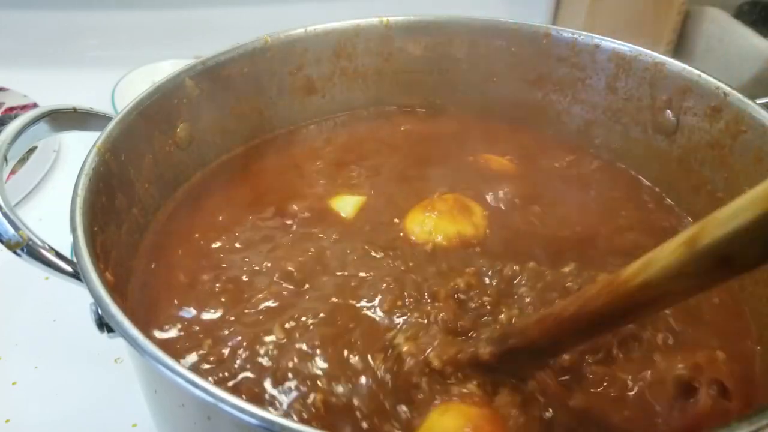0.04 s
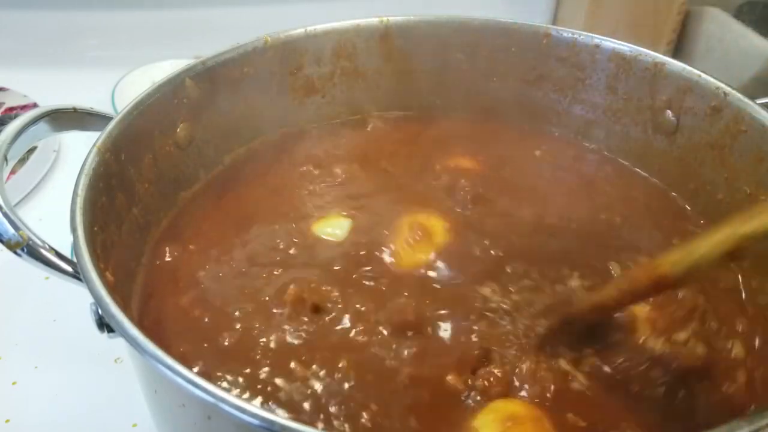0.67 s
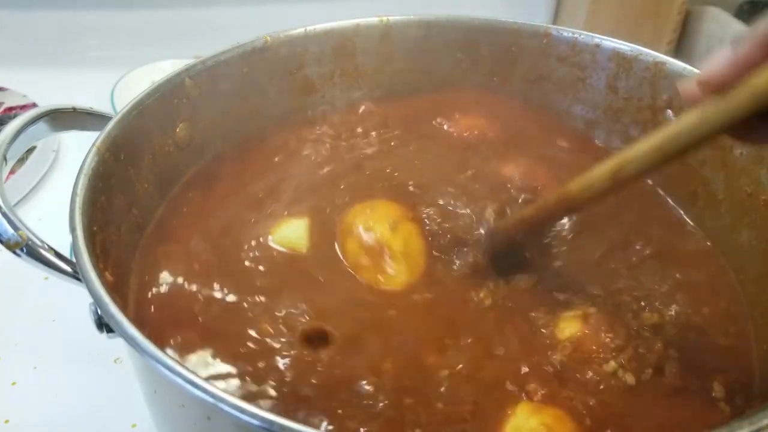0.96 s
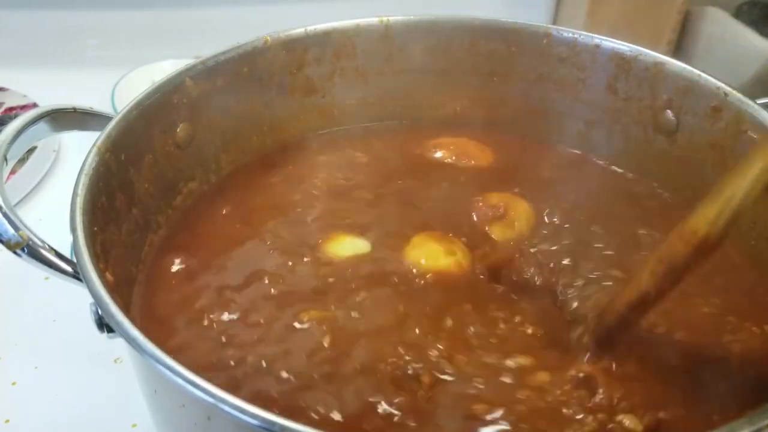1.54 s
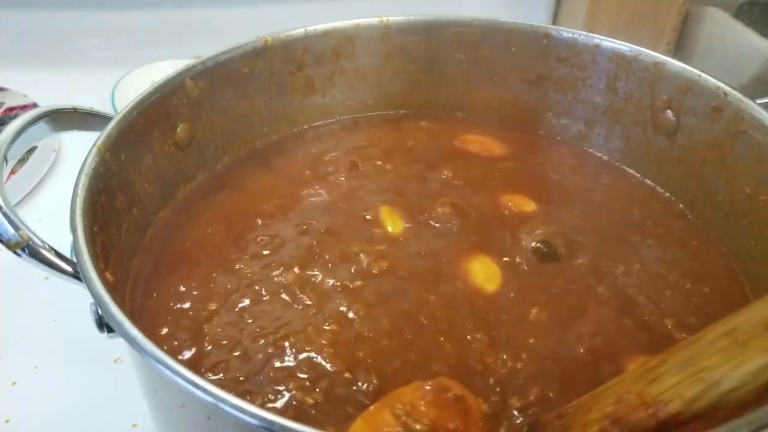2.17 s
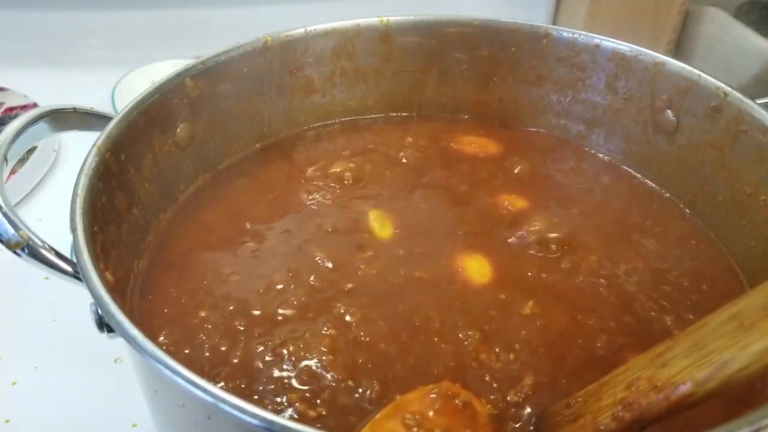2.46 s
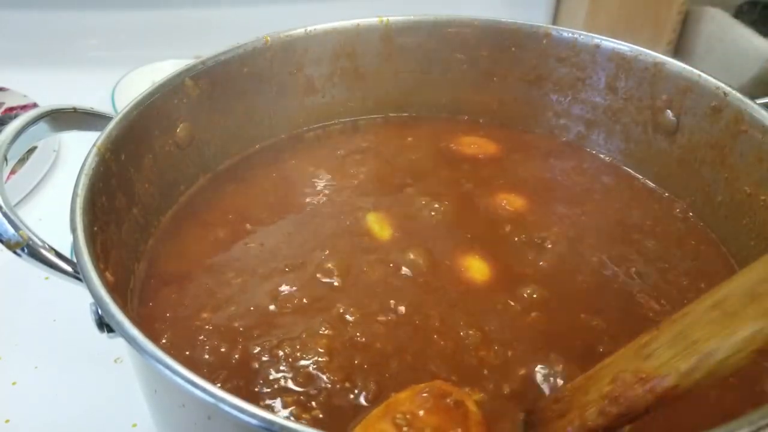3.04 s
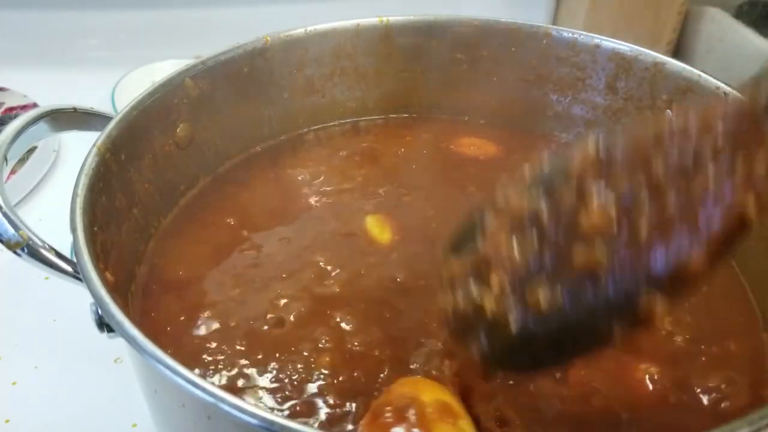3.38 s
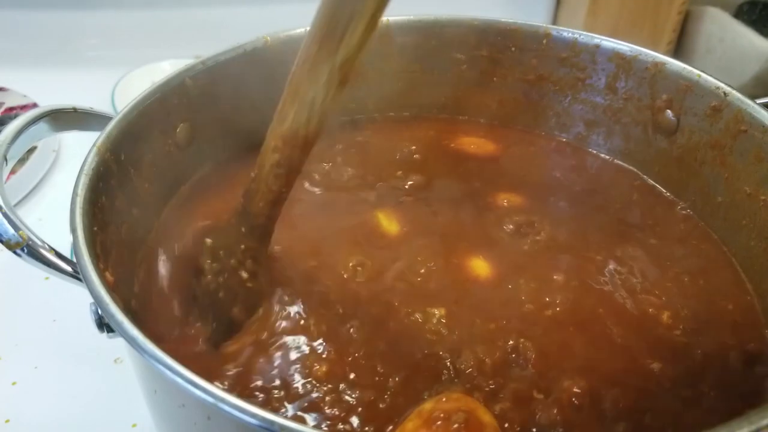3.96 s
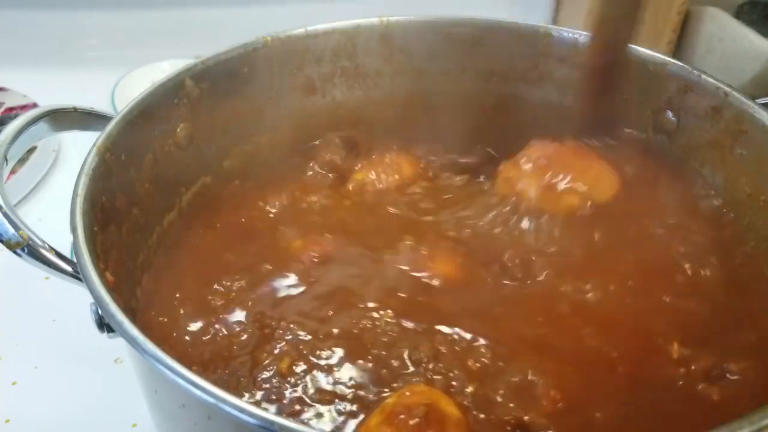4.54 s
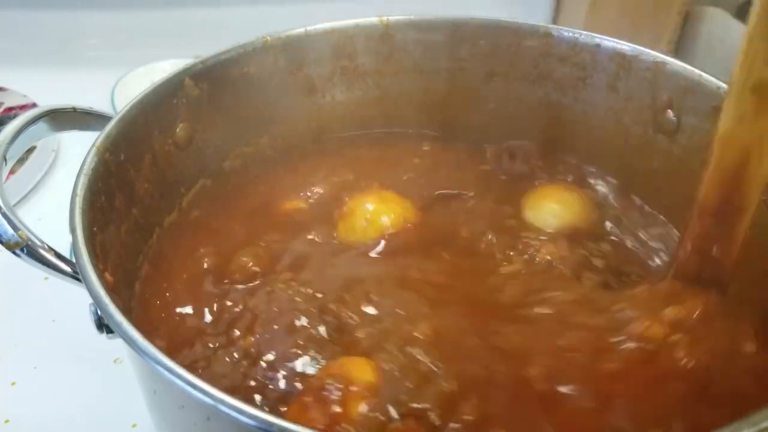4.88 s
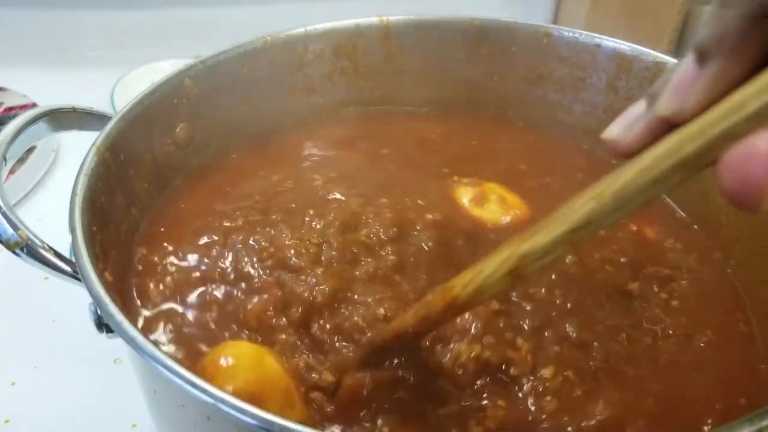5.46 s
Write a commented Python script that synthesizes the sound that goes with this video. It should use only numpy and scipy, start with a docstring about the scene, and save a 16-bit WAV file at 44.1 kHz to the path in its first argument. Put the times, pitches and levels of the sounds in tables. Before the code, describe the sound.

Thick stew bubbles, pops and sputters in a large metal pot while a wooden spoon stirs it and ticks the side once.

```python
"""Thick stew simmers in a large metal pot. From the start a wooden spoon churns it, while bubbles open
with short, choked, rising rings, skins snap, and steam pockets collapse with a glop and a spurt.
Just before one second the spoon ticks the steel wall, and the stew bubbles on by itself.
From 3.7 s the stirring returns and the pops crowd in; from 4.5 to 5.2 s the spoon drags along the bottom
with a low rumble. The pot and the kitchen answer every pop, over a faint hum."""
import sys
import numpy as np
from scipy import signal
from scipy.fft import rfft, irfft, next_fast_len
from scipy.io import wavfile
from scipy.ndimage import map_coordinates

SR = 44100
rng = np.random.default_rng(int(sys.argv[2]) if len(sys.argv) > 2 else 0)


def log_audio(samples):
    """Write samples as a 16-bit WAV file to the path given in sys.argv[1]."""
    # one column per channel
    frames = np.atleast_2d(samples).T
    # limit to full scale, then quantise
    limited = np.clip(frames, -1, 1)
    pcm = np.round(limited * 32767).astype(np.int16)
    wavfile.write(sys.argv[1], SR, pcm)


N = 247401


# Foreground bubbles opening: start_s, level_db, pitch_hz, ring_cycles
BUBBLE_HITS = [(0.0359, -28, 1570, 1.9), (0.1301, -20, 1510, 1.7), (0.2186, -27.5, 1780, 2.5),
               (0.2374, -30.5, 1310, 10.6), (0.4625, -22.5, 1910, 2.0), (0.4914, -27, 1190, 2.7),
               (0.6071, -26, 573, 2.9), (0.7712, -32, 940, 2.1), (0.7785, -20.5, 1150, 5),
               (0.784, -13, 1005, 1.3), (0.9741, -13.5, 1270, 1.4), (0.984, -24, 1070, 2.7),
               (1.2954, -21, 444, 2), (1.307, -35, 510, 2.1), (1.4042, -18.5, 1380, 2.2),
               (1.5225, -35, 400, 5.1), (1.6429, -29, 2300, 6.4), (1.7173, -21.5, 1013, 9.2),
               (1.721, -33, 177, 9.3), (1.8106, -23.5, 556, 0.91), (1.9372, -30.5, 646, 2),
               (1.9721, -30.5, 435, 3.4), (2.079, -33, 610, 4.4), (2.1747, -29, 1170.0, 2),
               (2.213, -32, 1200, 6.6), (2.3995, -30, 616, 4), (2.4167, -23, 2156, 5.4),
               (2.5935, -18, 1054, 1.45), (2.725, -27, 2160, 4.7), (2.7364, -24.5, 1224, 7.4),
               (2.668, -38.5, 1060, 9.8), (3.0048, -30.5, 1370, 3.7), (3.0117, -24.5, 564, 2.5),
               (3.096, -34.5, 600, 6), (3.2161, -13.5, 1150, 2.7), (3.2668, -24, 1240, 2.2),
               (3.3526, -18, 820, 1.3), (3.356, -29.5, 215, 3.4), (3.5768, -23, 1250, 1.55),
               (3.9834, -24, 515, 2.4), (4.068, -17, 1010, 3.3), (4.104, -8.5, 965, 4.4),
               (4.112, -21, 1070, 1.2), (4.1345, -20, 1030, 1.4), (4.1952, -12.5, 850, 1.1),
               (4.2279, -25.5, 910, 2.3), (4.2456, -18.5, 1170.0, 1.2), (4.3101, -28, 2240, 8.1),
               (4.3664, -23.5, 690, 2.1), (4.3699, -25, 1380, 3.2), (4.421, -24, 877, 4.4),
               (4.4316, -19, 820, 2.2), (4.4856, -27.5, 1470, 5.7), (4.5863, -27, 574, 2.8),
               (4.588, -15, 2040.0, 0.86), (4.6826, -28, 2430, 4.6), (4.7206, -25.5, 863, 12.4),
               (4.798, -28.5, 814, 3.8), (4.9549, -27, 1150, 5.1), (4.977, -23.5, 1220, 4.0),
               (5.074, -15, 1054, 3.2), (5.0745, -20, 2710, 12.8), (5.2008, -30, 715, 5.4),
               (5.24, -22, 650, 2.2), (5.3343, -22.5, 1730, 1), (5.3889, -25.5, 560.0, 4.9),
               (5.4385, -27, 223, 2.9), (5.4554, -27, 1170.0, 7.8), (5.4734, -28, 2410, 5.9)]
def bubbles():
    """The bubbles big enough to be heard one by one."""
    out = np.zeros((2, N))
    for start_s, level_db, pitch_hz, ring_cycles in BUBBLE_HITS:
        add(out, start_s, amp(level_db) * plop(pitch_hz, ring_cycles))
    return out


def plop(hz, cycles, smack_db=-9, ragged_db=3, gape_db=-14.5, gape_delay_cycles=2.47):
    """One bubble: the skin smacks, the cavity rings, then chirps higher as the mouth tears in jerks."""
    t = clock(.06)
    smack = tear(t, hz, octaves=0.86, skirt_db=-29, t60=0.015)
    late, detune = np.exp(0.1 * rng.standard_normal(2))
    gape_t = np.maximum(t - late * gape_delay_cycles / hz, 0)
    gape = ring(gape_t, detune * 1.6 * hz, cycles=5.54, rise=0.26)
    jerks = map_coordinates(rng.uniform(-1.8, 1, len(t)), [t * hz])
    cavity = amp(ragged_db * jerks) * (1.1 * ring(t, hz, cycles, rise=0.37) + amp(gape_db) * gape)
    return in_pot(cavity + amp(smack_db) * smack, wall_db=-8, wall_t60=0.055)


def ring(t, hz, cycles, rise, damping=0.88):
    """A cavity sings, its pitch climbing by the share `rise` as it opens, until the sauce chokes it."""
    age = t * hz / cycles
    swell = 1 - np.exp(-3 * t * hz)
    choke = np.exp(-age ** 4)
    pitch = hz * (1 + rise * np.minimum(age, 1))
    return swell * choke * np.exp(-damping * age) * np.sin(2 * np.pi * np.cumsum(pitch, axis=-1) / SR)


# Bubble skins snapping: start_s, level_db, pitch_hz, spray_db
SKIN_SNAPS = [(0.0287, -22, 12500, -15), (0.3103, -26.5, 5670, -26), (0.8373, -25, 8200, -23),
              (0.984, -22, 4600, 13), (1.1372, -24.5, 3770, 23), (1.5328, -21, 7700, -2),
              (1.6424, -39, 2650, -35), (1.7166, -22.5, 2130, -11), (2.6108, -23, 6600, -15),
              (2.742, -24, 3430, 2), (3.216, -19, 3710, 10), (3.266, -30, 7100, -33),
              (3.3509, -23, 4410, -14), (3.441, -22, 3720, 5), (3.5989, -25, 4680, -10),
              (3.627, -21.5, 8810, -25), (3.8825, -24, 13000, -16), (3.963, -20.5, 8800, 2),
              (4.0497, -24.5, 5700, -34), (4.0702, -27.5, 3730, -22), (4.2907, -22.5, 6860, -10),
              (4.5516, -28, 1870, 0), (4.627, -17.5, 12700, -2), (4.809, -21, 2600, -7),
              (5.0505, -24.5, 4000, 13), (5.0742, -10, 2960, -5.5), (5.0903, -14, 3590, 4.5),
              (5.26, -21, 13600, -11), (5.4552, -21.5, 12000, -2), (5.5857, -12.5, 3450, 0.5)]
def snaps():
    """A thin skin bursts with a sharp, bright tick."""
    out, t = np.zeros((2, N)), clock(.03)
    for start_s, level_db, pitch_hz, spray_db in SKIN_SNAPS:
        tick = tear(t, pitch_hz, octaves=0.6, skirt_db=spray_db, t60=0.0039)
        add(out, start_s + 0.0007, amp(level_db + 7.5) * in_pot(tick, wall_db=-7, wall_t60=0.042))
    return out


def tear(t, hz, octaves, skirt_db, t60):
    """A rip: a short burst of noise around a pitch, on a broadband skirt."""
    hump = lambda f: (np.exp(-(np.log2((f + 1) / hz) / octaves) ** 2) + amp(skirt_db)) * f / (f + hz / 2)
    fade = amp(-60 * np.maximum(t - 1 / hz, 0) / t60) * (t > 1 / hz)
    noise = filtered(rng.standard_normal(len(t)) * fade, hump)
    return noise * np.linalg.norm(fade) / np.linalg.norm(noise) / 2


# Steam pockets, each a glop and a spurt: start_s, spurt_length_s, glop_db, sputter_db, hiss_db
STEAM_POCKETS = [(0.011, 0.031, -37, -39, -49), (0.114, 0.03, -34.5, -43, -47),
                 (0.282, 0.022, -41, -41.5, -53), (0.51, 0.042, -62, -67, -53.5),
                 (0.6, 0.012, -33, -43, -48), (0.633, 0.022, -36, -37, -41),
                 (1.096, 0.028, -62, -47, -44.5), (1.513, 0.035, -30.5, -44, -45.5),
                 (1.639, 0.018, -40.5, -40, -44.5), (1.716, 0.053, -30.5, -46, -69),
                 (1.804, 0.026, -32, -42.5, -63), (2.171, 0.032, -35, -45.5, -54.5),
                 (2.212, 0.021, -43, -48, -45), (2.717, 0.018, -33, -35.5, -54),
                 (3.352, 0.013, -37.5, -34.5, -51), (3.566, 0.025, -59, -51.5, -49),
                 (4.211, 0.02, -33, -33, -61), (4.418, 0.059, -30, -42, -53.5),
                 (4.529, 0.035, -29.5, -37, -46), (4.58, 0.024, -34, -37.5, -49),
                 (4.948, 0.036, -35.5, -41.5, -44.5), (5.044, 0.026, -32, -38.5, -43.5),
                 (5.069, 0.021, -31.5, -34, -44), (5.321, 0.02, -31, -35, -35.5),
                 (5.446, 0.041, -34.5, -69, -62)]
def glops(glop_hz=225, slosh_hz=205):
    """A large pocket of steam collapses with a dull push, and the stew sloshes back."""
    out, t = np.zeros((2, N)), clock(.2)
    for start_s, _, glop_db, *_ in STEAM_POCKETS:
        slosh = tear(t, slosh_hz, octaves=1.8, skirt_db=-65, t60=0.11)
        push = ring(t, glop_hz * np.exp(0.18 * rng.standard_normal()), cycles=1.6, rise=.1)
        add(out, start_s + 0.002106, amp(glop_db) * (0.73 * push + 1.58 * slosh))
    return out


# Wet midrange of a spurt: frequency_hz, gain_db
SPUTTER_EQ = [(60, -36), (200, 3.5), (700, 9), (1200, -2.5), (2000, 11.5), (3000, -3.5), (5000, -10),
              (10000, -56)]
# Airy top of the spurts and the simmer: frequency_hz, gain_db
FIZZ_EQ = [(1200, -2.5), (3000, -1.5), (6500, -5.5), (10000, -6), (16000, -2.5)]
def spurts():
    """Steam forces a channel through the sauce: a lumpy wet sputter with hiss on top."""
    start_s, length_s, _, sputter_db, hiss_db = np.transpose(STEAM_POCKETS)
    sputter_gain = gate(zip(start_s, start_s + length_s, sputter_db), attack_s=0.0008, release_s=0.0025)
    hiss_gain = gate(zip(start_s, start_s + length_s, hiss_db), attack_s=0.018, release_s=0.0082)
    lumps = swarm(count=1500, centre_hz=1400, octaves=1, cycles=2.4, scatter_db=10)
    squelch = coloured(crackle(per_second=900, scatter_db=4, bed_db=-12), SPUTTER_EQ)
    spit = coloured(crackle(per_second=800, scatter_db=6, bed_db=-4), FIZZ_EQ)
    return sputter_gain * (amp(-3) * lumps + amp(-4) * squelch) + hiss_gain * amp(10) * spit


def crackle(per_second, scatter_db, bed_db):
    """Tiny bursts of uneven size on a bed of smooth noise."""
    sizes = amp(scatter_db * np.minimum(rng.standard_normal(N), 2))
    bursts = (rng.random(N) < per_second / SR) * sizes * rng.standard_normal((2, N))
    return unit(bursts) + amp(bed_db) * rng.standard_normal((2, N))


# Stirring strokes: start_s, end_s, level_db, pitch_hz
SPOON_STROKES = [(0, 0.68, -58, 1800), (3.703, 3.916, -44.5, 717), (4.144, 4.68, -52, 1650)]
def spoon_churn():
    """Each stroke of the spoon frees a dense cluster of small, quickly choked bubbles."""
    out = np.zeros((2, N))
    for start_s, end_s, level_db, pitch_hz in SPOON_STROKES:
        cluster = swarm(count=900, centre_hz=pitch_hz, octaves=.9, cycles=2.8, scatter_db=9)
        out += gate([(start_s, end_s, level_db)], attack_s=0.0037, release_s=0.024) * cluster
    return out


# The spoon's tick and its rebound: start_s, level_db
SPOON_TAPS = [(0.8718, -11), (0.8741, -26)]
# Partials of the struck pot wall: pitch_hz, level_db, t60_s
STEEL_MODES = [(3680, -33, 0.11), (3865, -28.5, 0.11), (5550, -21, 0.022), (6420, -29, 0.06)]
def spoon_tap():
    """The spoon ticks against the pot: a hard contact, then a thin steel ring."""
    out, t = np.zeros((2, N)), clock(.2)
    for start_s, level_db in SPOON_TAPS:
        steel = sum(amp(db - 60 * t / t60) * np.sin(2 * np.pi * (hz * t + rng.random((2, 1))))
                    for hz, db, t60 in STEEL_MODES)
        contact = tear(t, hz=3380, octaves=0.84, skirt_db=-15, t60=0.0074)
        tick = in_pot(contact, wall_db=0.5, wall_t60=0.022)[:, :len(t)]
        add(out, start_s, amp(level_db) * (steel + tick))
    return out


# Fader moves of the spoon's shove: time_s, level_db
DRAG_FADER = [(4.5, -65), (4.594, -49), (4.796, -36.5), (4.816, -47), (4.998, -89), (5.098, -38.5),
              (5.2, -64)]
# Low weight of the rumbling pot: frequency_hz, gain_db
RUMBLE_EQ = [(15, -24), (30, 2), (65, 16), (110, 11), (180, -4.5), (400, -49.5)]
def spoon_drag(fade_s=.05):
    """The spoon shoves heavy stew along the bottom and the pot rumbles, wide and more to the right."""
    rumble = unit(filtered(rng.standard_normal((2, N)), lambda hz: amp(along(RUMBLE_EQ, hz))))
    t = np.arange(N) / SR
    inside_s = np.minimum(t - DRAG_FADER[0][0], DRAG_FADER[-1][0] - t)  # negative outside the shove
    shove = amp(curves(DRAG_FADER)[0]) * np.clip(1 + inside_s / fade_s, 0, 1)
    return shove * rumble * amp([[-3], [2]])


# Fader moves of the boiling bed: time_s, simmer_db, fizz_db
BOIL_FADERS = [(0.0, -44, -52), (0.33, -44, -58), (0.48, -41.5, -47), (0.66, -43, -56.5),
               (1.23, -50, -56.5), (1.54, -44, -55.5), (1.62, -53, -58.5), (1.76, -44, -55.5),
               (1.91, -48, -58), (2.37, -50, -58), (3.55, -47, -56), (3.8, -49, -51.5), (4.0, -44.5, -52),
               (4.12, -43.5, -51), (4.53, -48, -54), (4.78, -44, -54), (5.17, -45.5, -52.5),
               (5.3, -47, -55), (5.61, -46, -56.5)]
# Warm body of the seethe: frequency_hz, gain_db
SEETHE_EQ = [(20, -40), (45, -37), (68, 5.5), (105, -5.5), (155, -1.5), (225, -0.5), (300, 4.5),
             (440, -2.5), (760, 1.5), (1100, -14), (2000, -10.5), (3500, -33), (9000, -32)]
def simmer():
    """The whole surface works in uneven surges: a soft seethe, small plops and the finest fizz."""
    simmer_db, fizz_db = curves(BOIL_FADERS)
    surge = wobble(knots_per_second=39)
    seethe = amp(-4.5 + 3.1 * surge) * coloured(rng.standard_normal((2, N)), SEETHE_EQ)
    fizz = amp(0.5 + 2.0 * surge) * coloured(rng.standard_normal((2, N)), FIZZ_EQ)
    # thick sauce damps small bubbles within a few cycles
    plops = swarm(count=520, centre_hz=660, octaves=.8, cycles=2, scatter_db=7)
    blips = swarm(count=520, centre_hz=1650, octaves=.9, cycles=2.6, scatter_db=11)
    prickle = swarm(count=750, centre_hz=4200, octaves=.8, cycles=4, scatter_db=12)
    sticky = swarm(count=500, centre_hz=9000, octaves=.6, cycles=2.2, scatter_db=12)
    glugs = swarm(count=130, centre_hz=210, octaves=.8, cycles=1.4, scatter_db=10)
    body = seethe + amp(-9) * glugs + amp(-6) * plops + amp(-9) * blips
    top = fizz + amp(-0.5) * prickle + amp(-4) * sticky
    return amp(simmer_db) * body + amp(fizz_db) * top


def swarm(count, centre_hz, octaves, cycles, scatter_db):
    """Many small bubbles of random size, damping and moment, at four spots on the surface; rms 1."""
    t = clock(.04)
    when, pitch, loud, damping, place = rng.random((count, 5)).T[..., None]
    hz = centre_hz * 2 ** (octaves * (2 * pitch - 1))
    life = cycles * 2 ** (1 - 2 * damping)
    # the longer a bubble rings, the lower its peak
    rings = amp(scatter_db * loud ** 2) / np.sqrt(life) * ring(t, hz, life, rise=0.27)
    samples = ((when * N).astype(int) + np.arange(len(t))).ravel()
    spots = [np.bincount(samples, (rings * (np.floor(4 * place) == spot)).ravel(), N)[:N]
             for spot in range(4)]
    return unit(sum(in_pot(spot, wall_db=0, wall_t60=0.037)[:, :N] for spot in spots))


def in_pot(sound, wall_db, wall_t60, predelay_s=0.0019):
    """Each spot on the surface has its own stereo position and scatter of echoes off the pot wall."""
    t = clock(.08)
    echoes = spread(rng.standard_normal((2, len(t)))) * amp(-60 * t / wall_t60) * (t > predelay_s)
    paths = amp(wall_db) * unit(echoes) / np.sqrt(len(t))
    lag = rng.integers(-4, 5)  # samples between left and right for the direct sound
    pan = amp(rng.standard_normal() * np.array([1, -1]))
    paths[[0, 1], [max(lag, 0), max(-lag, 0)]] += pan
    return signal.fftconvolve(sound[None], paths, axes=1)


# Resonances of the pot and its air: pitch_hz, t60_s, level_db
POT_MODES = [(215, 0.022, 30), (501, 0.36, 17), (600, 0.2, 35), (754, 0.085, 3.5), (1170, 0.045, 34),
             (2850, .2, 19), (3730, 0.28, 16), (3870, 0.26, 10)]
def pot_ring(x):
    """The pot and the air in it ring on after each pop."""
    t = clock(.3)
    modes = sum(amp(db - 60 * t / t60) * np.cos(2 * np.pi * hz * t) for hz, t60, db in POT_MODES)
    return signal.fftconvolve(x, modes[None] / np.linalg.norm(modes), axes=1)[:, :N]


# Reverb time of the kitchen: frequency_hz, t60_s
KITCHEN_DECAY = [(150, 0.2), (500, 0.1), (1200, 0.14), (3000, 0.14), (8000, 0.14), (15000, 0.21)]
def kitchen(x):
    """A short room tail in which each frequency dies at its own speed."""
    hz, t, bands = signal.stft(rng.standard_normal((2, SR // 2)), SR, nperseg=256)
    decay = amp(-60 * t / along(KITCHEN_DECAY, hz)[:, None])
    tail = spread(signal.istft(bands * decay, SR, nperseg=256)[1])
    return signal.fftconvolve(x, tail / np.linalg.norm(tail[0]), axes=1)[:, :N]


# Room tone: pitch_hz, level_db
HUM_TONES = [(66, -73.5), (118, -72)]
def hum():
    """A faint low hum in the kitchen."""
    t = np.arange(N) / SR
    return sum(amp(db) * np.sqrt(2) * np.sin(2 * np.pi * (hz * t + rng.random())) for hz, db in HUM_TONES)


# Stereo image: frequency_hz, left_right_correlation
STEREO_IMAGE = [(30, 1), (120, 0.89), (300, 1), (600, 0.75), (1200, 0.23), (2500, 0), (8000, 0)]
def spread(pair):
    """Two unrelated signals to left and right: bass nearly mono, treble wide."""
    angle = lambda hz: np.arccos(np.clip(along(STEREO_IMAGE, hz), -1, 1)) / 2
    mid, side = filtered(pair, lambda hz: np.array([np.cos(angle(hz)), np.sin(angle(hz))]))
    return np.array([mid + side, mid - side])


def coloured(pair, eq):
    """Stereo sound of rms 1, shaped by an EQ curve."""
    return unit(spread(filtered(pair, lambda hz: amp(along(eq, hz)))))


def filtered(x, response):
    """Apply a gain that depends on frequency."""
    n = x.shape[-1]
    padded = next_fast_len(n + 2048)
    return irfft(rfft(x, padded) * response(np.fft.rfftfreq(padded, 1 / SR)), padded)[..., :n]


def gate(rows, attack_s, release_s):
    """Soft-edged gain curve from rows of start_s, end_s, level_db."""
    gain, t = np.zeros(N), clock(.8)
    for start_s, end_s, level_db in rows:
        attack = 1 - np.exp(-t / attack_s)
        release = np.exp(-np.maximum(t - (end_s - start_s), 0) / release_s)
        add(gain, start_s, amp(level_db) * attack * release)
    return gain


def wobble(knots_per_second):
    """A smooth random curve."""
    knots = rng.standard_normal(int(N * knots_per_second / SR) + 4)
    return map_coordinates(knots, [np.arange(N) * knots_per_second / SR])


def curves(rows):
    """One value per sample for each column after the time."""
    time_s, *columns = np.transpose(rows)
    return [np.interp(np.arange(N) / SR, time_s, column) for column in columns]


def along(points, hz):
    """Read (frequency_hz, value) points on a log axis."""
    frequencies, values = np.transpose(points)
    return np.interp(np.log(hz + 1), np.log(frequencies + 1), values)


def add(track, start_s, sound):
    """Mix a sound into a track."""
    start = int(np.clip(round(start_s * SR), 0, N - 1))
    track[..., start:start + sound.shape[-1]] += sound[..., :N - start]


def clock(seconds):
    """Sample times of a short sound."""
    return np.arange(int(seconds * SR)) / SR


def amp(db):
    """Decibels to gain."""
    return 10 ** (np.asarray(db) / 20)


def unit(x):
    """Scale to rms 1."""
    return x / np.sqrt(np.mean(x ** 2) + 1e-20)


def scene():
    """The stew feeds the pot's ring and the kitchen reverb; the drag and the hum stay dry."""
    stew = bubbles() + snaps() + glops() + spurts() + simmer() + spoon_churn() + spoon_tap()
    return stew + amp(-28.5) * pot_ring(stew) + amp(-6) * kitchen(stew) + spoon_drag() + hum()


# Treble colour of the microphone: frequency_hz, gain_db
MICROPHONE_EQ = [(5000, 1), (7000, 1.5), (9500, -5), (13000, -1), (16000, -7)]
def record(dry, top_hz=16000):
    """The microphone colours the treble and keeps nothing above its band limit."""
    return filtered(dry, lambda hz: amp(along(MICROPHONE_EQ, hz)) * (hz < top_hz))


dry = scene()
out = record(dry)
log_audio(out)
```